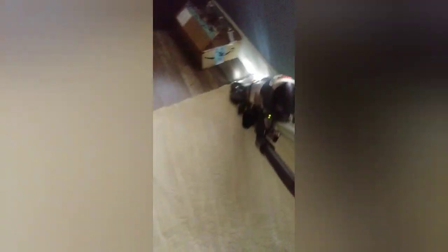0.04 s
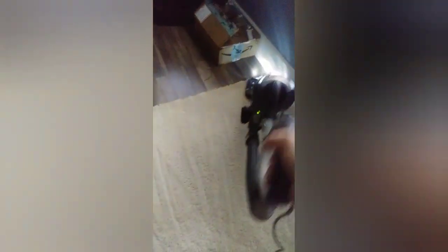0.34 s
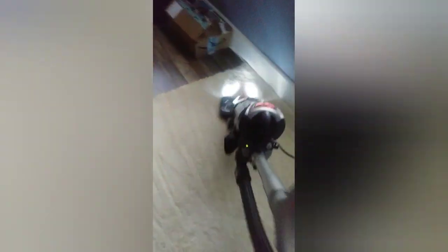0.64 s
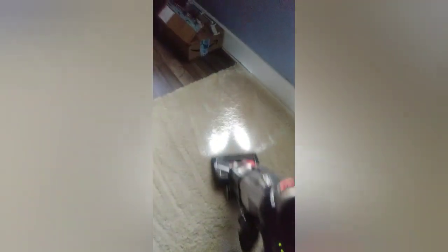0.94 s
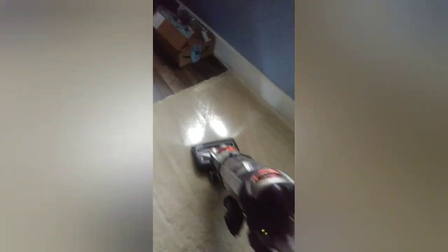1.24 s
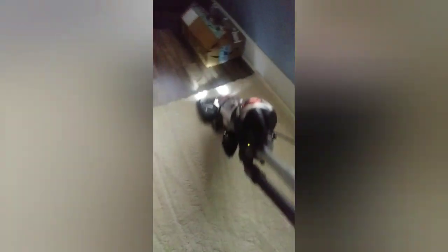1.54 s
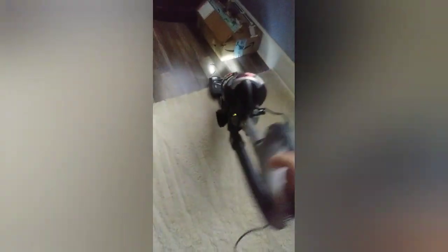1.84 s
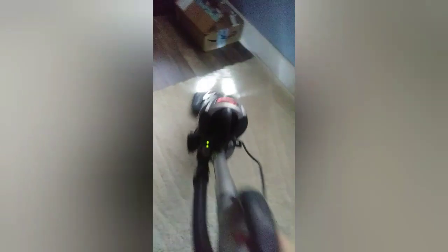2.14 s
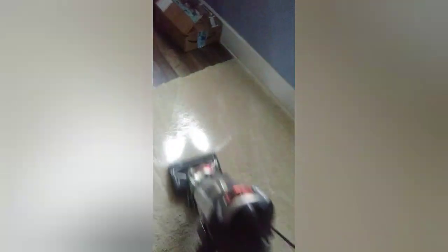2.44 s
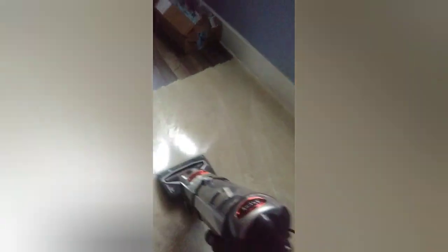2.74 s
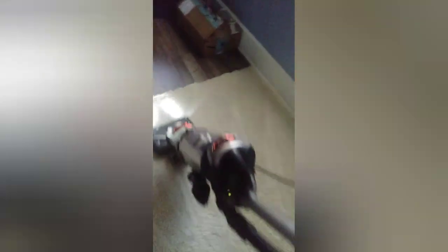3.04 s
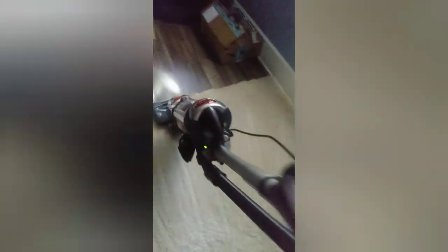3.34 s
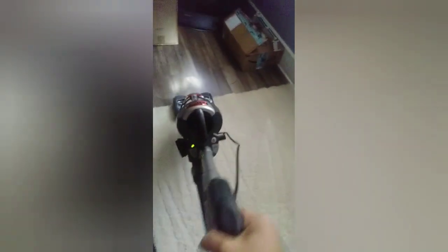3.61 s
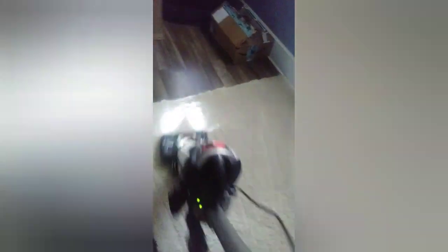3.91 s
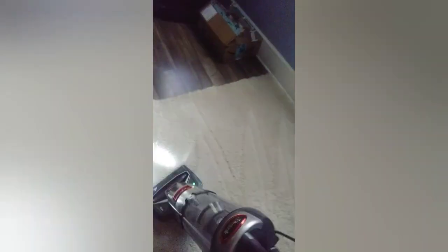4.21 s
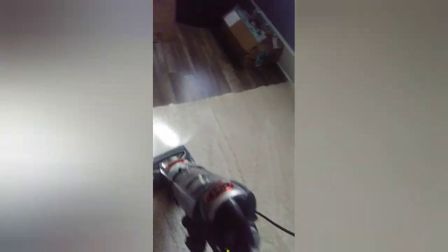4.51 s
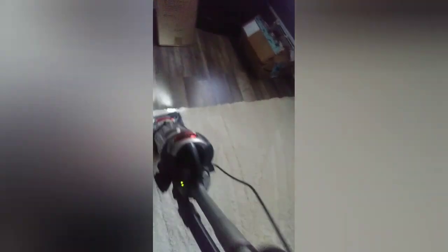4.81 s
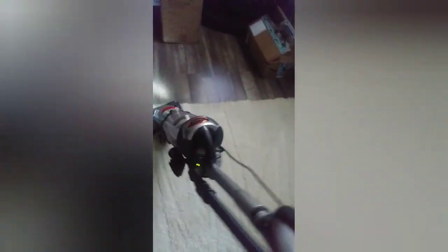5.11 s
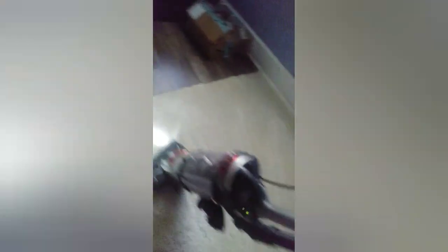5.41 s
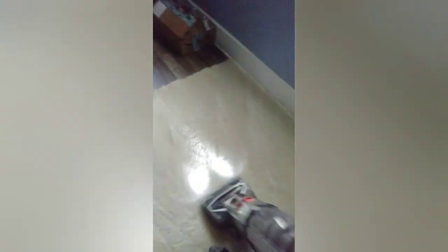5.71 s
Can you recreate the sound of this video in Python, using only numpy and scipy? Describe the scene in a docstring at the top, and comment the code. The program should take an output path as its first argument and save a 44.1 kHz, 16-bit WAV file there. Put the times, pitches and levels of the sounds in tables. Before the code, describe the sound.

Heard close, from above the handle, an upright vacuum cleaner moves to and fro over a room's carpet. Its continuous rush of air and high vent hiss shift with the strokes, over a motor whine of nearly constant pitch and a faint brush hum. Brief whistles come and go at the nozzle. Grit ticks lightly in the first half; later come a short, rough rising hoot and a few small plastic knocks.

```python
"""On a carpet, an upright vacuum cleaner is pushed to and fro, heard from above its handle.
Turbulent air roars through the ducts and hisses from the vents; the fan motor whines, the brush hums.
The nozzle whistles and gasps as its seal changes, and hoots as it lifts over the carpet's edge.
Grit ticks up the tube, and the plastic head rings as it bumps."""
import sys
import numpy as np
from scipy import signal
from scipy.fft import rfft, irfft, next_fast_len
from scipy.io import wavfile
from scipy.ndimage import uniform_filter1d, map_coordinates

SR = 44100
rng = np.random.default_rng(int(sys.argv[2]) if len(sys.argv) > 2 else 0)


def materialize(psi):
    """Save the field psi as 16-bit PCM at rate SR to the path in sys.argv[1].

    A 1-D psi becomes a single channel; in a 2-D psi each row is a channel.
    """
    bounded = np.clip(np.atleast_2d(psi).T, -1, 1)
    quanta = np.round(bounded * 32767).astype(np.int16)
    wavfile.write(sys.argv[1], SR, quanta)


N = 258426

# brush roll digs into the pile: peak t/s, length/s, hum f/Hz, hum level/dB, roar level/dB
BRUSH_DIGS = [(0.172, 0.27, 226, -43.5, -37.5), (0.818, 0.57, 238.7, -51.5, -51),
              (1.742, 0.22, 238.3, -49, -40), (2.429, 0.44, 238.5, -52.5, -41),
              (3.47, .22, 238, -48, -34.5), (4.83, 0.17, 236.1, -46.5, -49), (5.66, 0.55, 239.7, -51, -56)]


def suction(gasp_rush_db=2.2, gasp_leak_db=1.8):
    """Air roars in the ducts, more as the brush digs, rushes under the nozzle and leaks past the seal."""
    # air noise spectra: f/Hz, relative level/dB
    roar_spectrum = [(30, -80), (70, -60), (100, -45), (150, -33), (200, -17), (270, -15), (350, -4),
                     (520, -2.5), (680, 1), (850, -0.5), (1100, -1.5), (1500, -23.5), (2500, -53)]
    rush_spectrum = [(700, -52), (1100, -5.5), (1350, 0), (1800, 0), (2100, 1.5), (2370, -3.5),
                     (2700, -4.5), (3050, -5.5), (3350, -20.5), (3650, -11), (3930, -1.5), (4300, -21),
                     (5000, -48)]
    leak_spectrum = [(2500, -49), (3050, 11.5), (3400, 12), (3900, 7.5), (4300, -7), (5200, -29)]
    digging = sum(amp(db) * swell(s, length) for s, length, _, _, db in BRUSH_DIGS)
    roar = (amp(flow_db("roar")) + digging) * air(roar_spectrum, patchy_db=1.26)
    rush = amp(flow_db("rush") + gasp_rush_db * gasp()) * air(rush_spectrum, patchy_db=1.35)
    leak = amp(flow_db("leak") + gasp_leak_db * gasp()) * air(leak_spectrum, patchy_db=2.3)
    return roar + rush + leak


def exhaust(vent_trim_db=-1, fizz_follow=.6):
    """Filter and vents hiss together; the jets beam their treble, which sweeps past as the body swivels."""
    # hiss spectra: f/Hz, relative level/dB
    filter_spectrum = [(3600, -62), (4100, -2.5), (4500, -3), (4900, -0.5), (5300, 1), (5800, -24),
                       (6800, -28)]
    fizz_spectrum = [(8500, -50), (10300, 4.5), (11500, 8.5), (12500, 5), (14000, -0.5), (15800, -5)]
    jet_spectrum = [(5200, -61), (6500, -9), (7300, 6), (8200, 2), (9300, -1.5), (10500, -5.5),
                    (12000, -39), (16000, -40)]
    vent_spectrum = [(4500, -49), (5100, -17.5), (5500, -2.5), (6250, -0.5), (6900, -2), (7600, -17),
                     (9000, -19.5), (12000, -46)]
    # vent hiss: t/s, level before trim/dB
    vent_levels = [(0, -23.5), (.4, -24), (.62, -24.5), (.85, -25), (1.35, -25.5), (1.75, -22.5),
                   (2.2, -22.5), (2.42, -21), (2.8, -23), (3.1, -26), (3.35, -23.5), (3.72, -23.5),
                   (3.92, -21), (4.28, -22.5), (4.55, -24), (5.27, -26.5), (5.55, -23.5), (5.8, -29)]
    # passing jet beams: start t/s, length/s, first f/Hz, last f/Hz, level/dB
    beams = [(-.08, 0.21, 8200, 7980, -24.5), (.17, 0.28, 11000, 10400, -34), (.37, 0.21, 9300, 8800, -30),
             (.56, 0.16, 7170, 7170, -23.5), (1.43, 0.39, 7830, 7470, -24.5),
             (1.62, 0.63, 8820, 8880, -30.5), (1.78, 0.4, 11500, 12200, -38),
             (3.27, .24, 8120, 9160, -28.5), (3.45, 0.26, 11900, 12600, -39),
             (3.62, 0.16, 7510, 7400, -25.5), (4.6, .22, 7260, 7260, -28.5), (4.96, 0.23, 7400, 7090, -30)]
    vent_db = curves(vent_levels)[0]
    surge_db = vent_db - vent_db.mean()
    filter_hiss = amp(flow_db("filter") + surge_db) * air(filter_spectrum, patchy_db=1.95)
    fizz = amp(flow_db("fizz") + fizz_follow * surge_db) * air(fizz_spectrum, patchy_db=2.5)
    jets = amp(flow_db("jet")) * air(jet_spectrum, patchy_db=2.1) + blown_notes(beams, width_hz=810)
    vents = amp(vent_db + vent_trim_db) * air(vent_spectrum, patchy_db=1.97)
    return filter_hiss + vents + jets + fizz


def motor(shaft_hz=629.3, sag_hz=2.6, drift_hz=0.95, flutter_db=0.7, skirt_gain=0.29):
    """The fan's shaft tone sags a little with reach; turbulence blurs its overtones."""
    # shaft tone: t/s, level/dB
    whine_levels = [(0, -36), (.44, -25.5), (.67, -43), (.9, -44), (1.38, -37.5), (1.65, -25), (2.05, -31),
                    (2.35, -33.5), (2.85, -32), (3.02, -37), (3.55, -35), (3.72, -25), (3.93, -35),
                    (4.15, -29.5), (4.46, -36), (5.2, -34.5), (5.32, -32), (5.86, -38)]
    # overtones of the seven-blade fan: shaft multiple, level/dB
    harmonics = [(2, -42), (4, -41.5), (7, -42.5)]
    hz = shaft_hz - sag_hz * stroke() + drift_hz * wobble(14)
    tone = unit(np.sin(turns(hz)) * amp(flutter_db * wobble(40)))
    skirt = skirt_gain * blown_tone(hz, width_hz=29)
    overtones = sum(amp(db) * blown_tone(k * hz, width_hz=5.6) for k, db in harmonics)
    return amp(curves(whine_levels)[0]) * (tone + skirt) + overtones


def nozzle_whistles():
    """The nozzle whistles and moans as its seal changes."""
    # start t/s, length/s, first f/Hz, last f/Hz, level/dB
    whistles = [(.3, 0.82, 1725, 1735, -33.5), (.66, 0.54, 402, 398, -41), (.94, 0.17, 1560, 1264, -29.5),
                (1.08, .69, 1383, 1380, -33), (2.25, 0.654, 1275, 1290, -36.5),
                (2.52, .12, 1500, 1381, -30), (3.06, 0.55, 1330, 1457, -32), (3.56, 0.169, 1740, 1960, -31),
                (3.58, 0.198, 788, 707, -32), (4.6, 0.46, 1492, 1319, -31), (5.22, 0.64, 1666, 1691, -34),
                (5.41, .17, 1252, 1256, -29.5)]
    return blown_notes(whistles, width_hz=46)


def nozzle_hollow(rest_hz=2690, climb_hz=300):
    """The nozzle's hollow resonance climbs with each gasp."""
    return amp(flow_db("hollow")) * blown_tone(rest_hz + climb_hz * gasp(), width_hz=154)


def nozzle_hoot(roughness=0.37):
    """A rough rising note as the nozzle lifts over the carpet's edge."""
    # start t/s, length/s, first f/Hz, last f/Hz, level/dB
    hoots = [(3.72, .21, 625, 833, -25)]
    out = np.zeros(N)
    for row in hoots:
        hz, gain = glide(*row)
        out += gain * unit(np.sin(turns(hz)) + roughness * blown_tone(hz, width_hz=92))
    return out


def head_bumps(clack_gain=0.47, clack_t60_s=0.023, scatter_db=1.9, attack_s=0.0012):
    """Each bump clacks and rings the plastic head's modes at new strengths."""
    # bumps: t/s, relative level/dB
    bumps = [(2.57, -28), (3.832, -27), (3.858, -19.5), (3.874, -23), (3.911, -24), (3.95, -26.5)]
    # head modes: f/Hz, relative level/dB, t60/s
    modes = [(567, 1, 0.14), (668.5, 2.5, 0.088), (774, 1, 0.065), (1456, -10, 0.13), (1604, 0, .05),
             (2083, -5, 0.044)]
    # what the head radiates: f/Hz, gain/dB
    radiation = [(60, -49), (200, -20), (500, -1.5), (3000, 10.5), (9000, -8), (16000, -17)]
    out, t = np.zeros(N + SR), np.arange(SR // 4) / SR
    attack = 1 - np.exp(-t / attack_s)
    for s, db in bumps:
        ring = np.zeros(len(t))
        for hz, mode_db, t60 in modes:
            decay = amp(mode_db + rng.normal(0, scatter_db) - 60 * t / t60)
            ring += decay * np.sin(2 * np.pi * (hz * t + rng.random()))
        clack = clack_gain * amp(-60 * t / clack_t60_s) * rng.standard_normal(len(t))
        out[round(s * SR):][:len(t)] += amp(db) * (ring + clack) * attack
    return coloured(out[:N], radiation)


def grit(trim_db=-3.0, t60_s=0.029):
    """Crumbs tick against the tube on their way up."""
    # impacts: t/s, relative level/dB
    ticks = [(1.0301, -16), (1.0917, -19.5), (1.1004, -19), (1.17, -13), (2.0921, -24), (2.142, -25),
             (2.2137, -17), (2.6578, -28)]
    # tube response: f/Hz, gain/dB
    tube = [(3000, -29), (7000, 9), (13000, -6), (15800, -7)]
    out, t = np.zeros(N + SR), np.arange(SR // 10) / SR
    for s, db in ticks:
        out[round(s * SR):][:len(t)] += amp(db + trim_db - 60 * t / t60_s) * rng.standard_normal(len(t))
    return coloured(out[:N], tube)


def brush(free_hz=239, idle_db=-60, drift_hz=3, flutter_db=1.7):
    """The brush roll beats the pile: an unsteady hum, louder and mostly slower where it digs in."""
    hz = free_hz + sum((dig_hz - free_hz) * swell(s, length) for s, length, dig_hz, _, _ in BRUSH_DIGS)
    gain = amp(idle_db) + sum(amp(db) * swell(s, length) for s, length, _, db, _ in BRUSH_DIGS)
    hum = np.sin(turns(hz + drift_hz * wobble(12)))
    return gain * unit(hum * amp(flutter_db * wobble(17)))


def walls(x, echo_gain=0.082, swing_s=.0012):
    """Wall and floor echoes shift with the stroke and sweep a faint comb through the noise."""
    shift_s = swing_s * stroke()
    delays_s = [.0042 - shift_s, .0085 - 2 * shift_s, .013 + shift_s]
    echoes = sum(map_coordinates(x, [np.arange(N) - s * SR], order=3, mode="mirror") for s in delays_s)
    return (x + echo_gain * echoes) / np.sqrt(1 + len(delays_s) * echo_gain ** 2)


def stroke():
    """The arm's reach, rounded at the turns."""
    # t/s, reach (0 pulled in, 1 pushed out)
    reaches = [(0, 0.73), (.35, 0.95), (.6, 0.72), (1.08, 0.19), (1.5, 0.74), (1.9, 0.8), (2.25, 0.45),
               (2.6, 0.25), (3, 0.51), (3.55, 0.98), (3.8, 0.87), (4.3, 0.26), (4.7, 0.49), (5.05, 0.79),
               (5.4, 0.7), (5.86, 0)]
    return uniform_filter1d(curves(reaches)[0], size=SR // 4)


def gasp(length_s=.22):
    """Opening of the nozzle's seal at the end of each pull, 0-1."""
    # peak t/s, opening
    gasps = [(.99, 0.92), (2.561, 0.96), (4.151, .8), (5.828, 0.98)]
    return sum(opening * swell(s, length_s) for s, opening in gasps)


def flow_db(name):
    """Level of one air noise from the cleaner's place and its speed over the carpet."""
    # name: mid-stroke level/dB, dB per reach, dB per (reach/s), dB per bearing
    flow_laws = {"roar": (-30, 1.8, 0, -0.5), "rush": (-27, -1, -0.5, -1.65),
                 "leak": (-37.5, -0.5, -3.5, -1.8), "hollow": (-34, -7, 1.2, -4),
                 "filter": (-30.5, -4, -1, -1.1), "jet": (-29.5, 2.5, 0, 2.1), "fizz": (-38.5, 7, 2, 0)}
    # cleaner's direction: t/s, bearing (-1 left, 1 right)
    bearings = [(0, .9), (.5, 1), (1.1, -0.44), (1.6, 0.94), (2.05, 1), (2.6, -0.32), (3.2, 0.31),
                (3.9, -0.57), (5.86, -0.49)]
    mid_db, reach_db, push_db, bearing_db = flow_laws[name]
    reach = stroke()
    speed = np.gradient(reach) * SR
    return mid_db + reach_db * (reach - .5) + push_db * speed + bearing_db * curves(bearings)[0]


def air(spectrum, patchy_db):
    """Turbulent noise, rms 1, with patches of random gain in time and frequency."""
    bins = signal.stft(rng.standard_normal(N), nperseg=1024)[2]
    patches = uniform_filter1d(rng.standard_normal(bins.shape), size=7, axis=0)
    patches = uniform_filter1d(patches, size=14, axis=1)
    noise = signal.istft(bins * amp(patchy_db * unit(patches)), nperseg=1024)[1][:N]
    return unit(coloured(noise, spectrum))


def blown_tone(hz, width_hz):
    """A resonance of moving pitch blown by turbulence, rms 1."""
    drive = filtered(rng.standard_normal((2, N)), lambda f: 1 / np.cosh(np.minimum(f / width_hz, 20)))
    return unit(drive[0] * np.cos(turns(hz)) + drive[1] * np.sin(turns(hz)))


def blown_notes(rows, width_hz):
    """One gliding blown resonance per row."""
    glides = (glide(*row) for row in rows)
    return sum(gain * blown_tone(hz, width_hz) for hz, gain in glides)


def glide(start_s, length_s, first_hz, last_hz, db, fade_s=0.066):
    """Pitch and gain of a note that fades in and out while sliding evenly."""
    t = np.arange(N) / SR - start_s
    edge = np.clip(np.minimum(t, length_s - t) / fade_s, 0, 1)
    return np.interp(t, [0, length_s], [first_hz, last_hz]), amp(db) * np.sin(np.pi / 2 * edge)


def swell(peak_s, length_s):
    """A smooth hump of height 1."""
    return np.cos(np.pi * np.clip((np.arange(N) / SR - peak_s) / length_s, -.5, .5)) ** 2


def wobble(rate_hz):
    """A smooth random curve with knots at rate_hz."""
    knots = rng.standard_normal(int(N * rate_hz / SR) + 4)
    return map_coordinates(knots, [np.arange(N) * rate_hz / SR])


def curves(rows):
    """One value per sample for each column after the time."""
    s, *columns = np.transpose(rows)
    return [np.interp(np.arange(N) / SR, s, column) for column in columns]


def coloured(x, spectrum):
    """x through (f/Hz, gain/dB) points joined on a log axis."""
    f, db = np.transpose(spectrum)
    return filtered(x, lambda hz: amp(np.interp(np.log(hz + 1), np.log(f), db)))


def filtered(x, response):
    """x through a zero-phase gain, response(f/Hz)."""
    size = next_fast_len(N + SR // 2)
    return irfft(rfft(x, size) * response(np.fft.rfftfreq(size, 1 / SR)), size)[..., :N]


def turns(hz):
    """Running phase/rad of a moving frequency."""
    return 2 * np.pi * np.cumsum(hz) / SR


def amp(db):
    """Decibels to gain."""
    return 10 ** (np.asarray(db) / 20)


def unit(x):
    """Scale to rms 1."""
    return x / np.sqrt(np.mean(x ** 2) + 1e-20)


def scene():
    """The whole cleaner, alike in both channels."""
    noises = walls(suction() + exhaust() + grit() + head_bumps())
    nozzle = nozzle_hollow() + nozzle_whistles() + nozzle_hoot()
    mono = noises + nozzle + motor() + brush()
    return np.array([mono, mono])


def record(dry, low_cut_hz=95, top_hz=15800):
    """The small microphone drops the bass; nothing passes above top_hz."""
    return filtered(dry, lambda hz: (hz < top_hz) * hz ** 2 / np.hypot(hz ** 2, low_cut_hz ** 2))


dry = scene()
out = record(dry)
materialize(out)
```